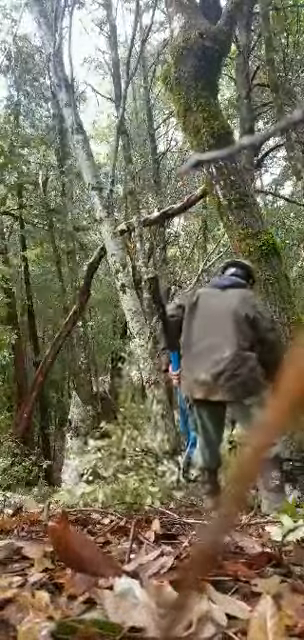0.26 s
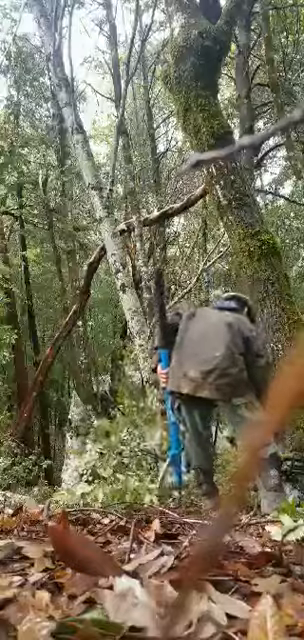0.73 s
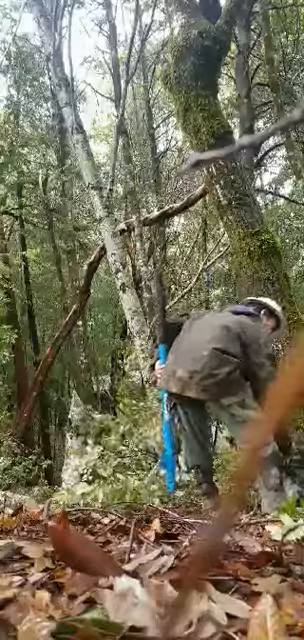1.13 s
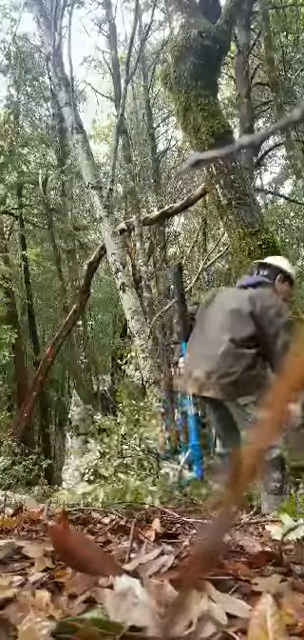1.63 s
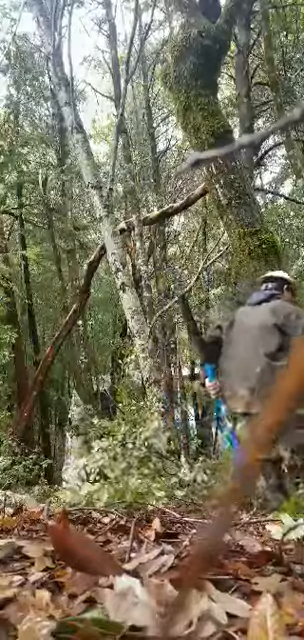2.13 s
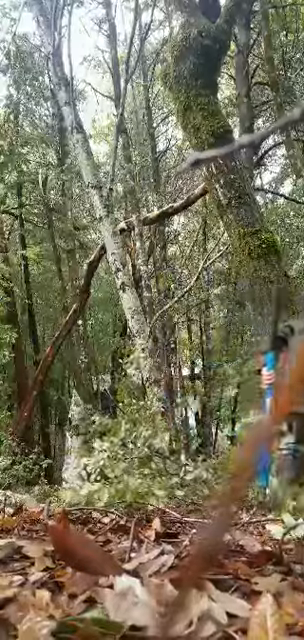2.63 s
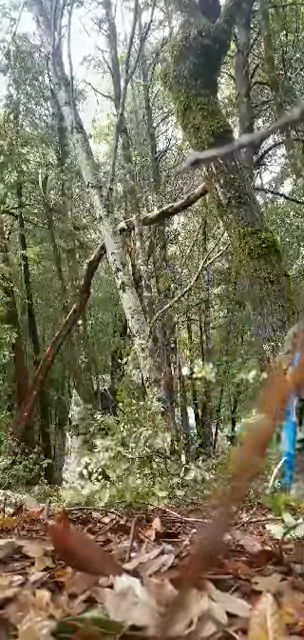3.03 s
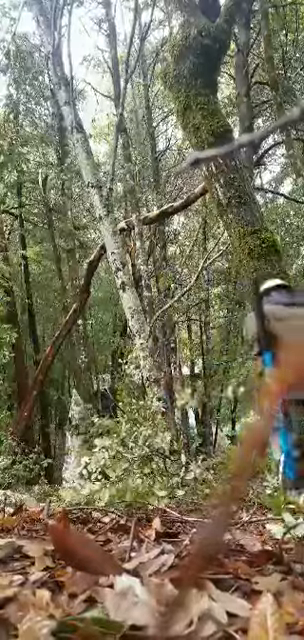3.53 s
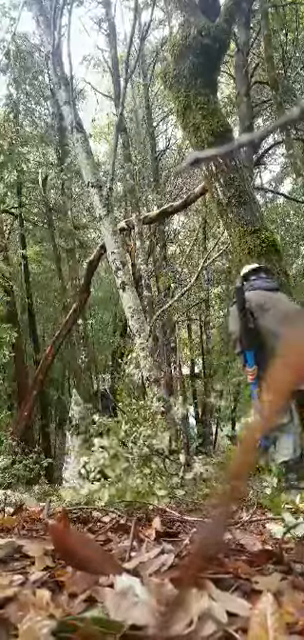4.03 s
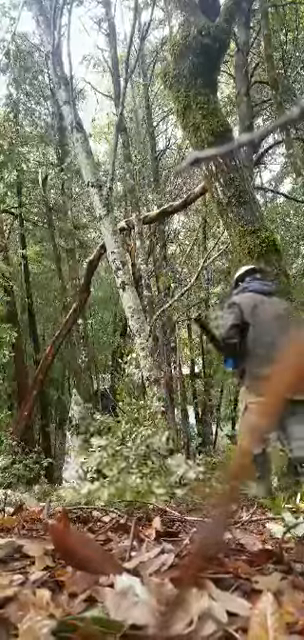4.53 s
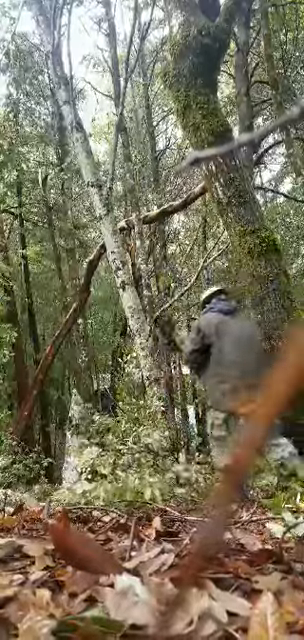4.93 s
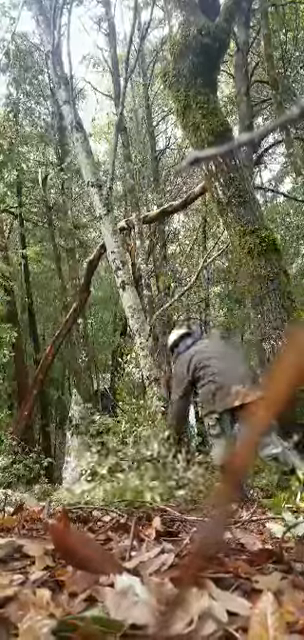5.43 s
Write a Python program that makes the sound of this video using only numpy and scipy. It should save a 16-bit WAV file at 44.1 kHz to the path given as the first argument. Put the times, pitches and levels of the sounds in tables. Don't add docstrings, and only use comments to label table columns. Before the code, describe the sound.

Someone shuffles through dry leaves and brush in a wood, a hard twig snap early on, faint foliage hiss and distant engine rumble.

```python
import sys
import numpy as np
from scipy import signal
from scipy.fft import rfft, irfft, next_fast_len
from scipy.io import wavfile
from scipy.ndimage import uniform_filter1d

SR = 44100
rng = np.random.default_rng(int(sys.argv[2]) if len(sys.argv) > 2 else 0)


def volts_from_db(level):
    exponent = np.asarray(level, float) / 20
    return 10 ** exponent


def inscribe(sig):
    pcm = np.round(np.clip(np.atleast_2d(sig).T, -1, 1) * 32767)
    wavfile.write(sys.argv[1], SR, pcm.astype(np.int16))


N = 250047
LONG = next_fast_len(N)


def leaves():
    # [f/Hz, level/dB per Hz]
    leaf_colour = [(290, -18.5), (500, -4.5), (937, -15.5), (1180, -5), (1410, -7), (2580, -4),
                   (3340, -7.5), (3780, -6), (4330, -6), (4830, -3), (5460, -6), (6800, -5.5),
                   (9310, -11.5), (12600, -11), (13100, -14)]
    # [start t/s, length/s, stirring level/dB, change by the end/dB, fine fizz relative level/dB]
    stirs = [(0.0, .06, -58.5, -4.5, -3), (0.065, 0.13, -50.5, -0.5, -4), (.212, 0.059, -60, 0.5, -3),
             (0.342, 0.11, -61, -6.5, -7), (.48, .11, -63.5, -0.5, -2), (0.685, 0.024, -59.5, -5, -2.5),
             (0.737, 0.065, -70, -1.5, -1), (1.207, 0.072, -63, 1.5, -1.5), (1.31, 0.22, -62.5, 2.5, -6),
             (1.518, 0.23, -53.5, 2.5, -5.5), (1.765, 0.21, -49, -2.5, -6), (2.008, 0.066, -53, 0.5, -3),
             (2.102, 0.4, -45, 0, -4), (2.524, 0.48, -46, -9, -4.5), (3.0, 0.31, -52.5, -4.5, -4),
             (3.317, 0.23, -57.5, -1, -4), (3.552, 0.137, -55.5, 7, -4), (3.693, 0.16, -47, -7, -3.5),
             (3.861, 0.15, -51, 0.5, -3), (4.015, 0.23, -51.5, -15, -3.5), (4.248, 0.24, -64, 2, -3),
             (4.502, .27, -57.5, 0, -2), (4.861, 0.32, -63, -6.5, 0), (5.238, .43, -72, 13.5, 2.5)]
    crackle = grains(per_s=4000, spread_db=2.5, ring_s=0.00082, clump_db=2.0, clump_hz=25.6)
    rustle = 0.85 * rng.standard_normal((2, N))
    field = per_band(pair(crackle + rustle, [(300, -60)] + leaf_colour + [(13400, -70)]))
    hz, t, z = signal.stft(field, SR, nperseg=256, noverlap=192)

    power = gestures(stirs, t, rise_s=0.021, settle_db_per_s=494)
    level_db = 10 * np.log10(power.sum(0))
    fizz_db = np.transpose(stirs)[4] @ power / power.sum(0)
    heavy_db = 0.6 + 0.13 * np.clip(weight_db(t) - level_db, -20, 20)
    heavy = np.clip((3600 - hz) / 1200, 0, 1)[:, None] * heavy_db
    fizz = np.clip((hz - 6500) / 1500, 0, 1)[:, None] * (fizz_db + 4.5)

    patches = rng.standard_normal((len(t), len(hz))).T
    patches = uniform_filter1d(patches, size=2, axis=0)
    patches = evened(uniform_filter1d(patches, size=24, axis=1))
    struck = rng.random((len(t), len(hz))).T < 0.012
    rings = rng.exponential(1, (len(t), len(hz))).T * struck
    rings = signal.lfilter([1], [1, -0.85], rings, axis=1)

    gain_db = level_db + heavy + fizz + 2.0 * patches + 3.84 * np.minimum(rings, 3)
    return signal.istft(z * volts_from_db(gain_db), SR, nperseg=256, noverlap=192)[1][:, :N]


def soil():
    # [f/Hz, level/dB per Hz]
    soil_colour = [(65, -38), (110, 0.5), (178, -3), (274, -1.5), (307, 1), (420, -0.5), (642, -19),
                   (937, -22.5), (1000, -22), (1300, -51), (2200, -120)]
    lumps = grains(per_s=260, spread_db=1.9, ring_s=0.0018, clump_db=1.7, clump_hz=7.7)
    thud = lumps + 0.49 * rng.standard_normal((2, N))
    thud = evened(pair(thud, [(70, -48)] + soil_colour + [(1500, -60)]))
    return volts_from_db(heard(weight_db) - 2.24) * thud


def weight_db(t):
    # [start t/s, length/s, level/dB, change by the end/dB]
    treads = [(.05, 0.15, -54.5, -3.5), (.3, 0.065, -57, -1.5), (.47, 0.084, -63, -0.5),
              (.65, .35, -75.5, 8), (1.02, .03, -58.5, -4), (1.24, 0.2, -56, -1.5),
              (1.51, 0.018, -50.5, 4.5), (1.58, 0.12, -59, 10), (1.75, 0.05, -51.5, 2),
              (1.85, 0.22, -57.5, 6), (2.1, 0.11, -44, 2), (2.24, 0.41, -47, -1), (2.72, 0.15, -53, 6),
              (2.9, 0.52, -57, 0), (3.45, 0.14, -54.5, 2), (3.62, 0.1, -45.5, 0.5), (3.82, 0.19, -45, 2),
              (4.08, 0.093, -51.5, -7.5), (4.25, 0.13, -61, 1.5), (4.46, 0.04, -51, -5.5),
              (4.55, 0.28, -50.5, -2.5), (4.88, 0.23, -59.5, -0.5), (5.25, .2, -56, 3),
              (5.52, 0.12, -53.5, -2.5)]
    rest_db = -70.5
    power = gestures(treads, t, rise_s=0.034, settle_db_per_s=184).sum(0)
    return 10 * np.log10(power + volts_from_db(rest_db) ** 2)


def snap(db, ring_hz, knock_db, top_db, t60):
    t = np.arange(int(SR * 0.05)) / SR
    fade = volts_from_db(-60 * t / max(t60, 0.002)) * np.minimum(t / 0.0002, 1)
    noise = rng.standard_normal((3, len(t)))
    noise[:, 8] += 3
    cracks = (noise[0] + 1.1 * noise[1:]) * fade
    ring = np.sin(2 * np.pi * ring_hz * t) * fade * rng.uniform(0.78, 1, (2, 1))
    body = band(cracks, 0.52 * ring_hz, min(2.18 * ring_hz, 14000))
    body = body / abs(body).max() + 0.35 * ring
    top = band(cracks, 9000, 14700) * volts_from_db([[-6.0], [6.0]])
    knock = band(noise[0] * fade ** 0.5, 220, 1140)
    parts = (body, 0), (top, top_db + 5.5), (knock, knock_db - 7.0)
    mix = sum(volts_from_db(db + rel_db) * part / abs(part).max() for part, rel_db in parts)
    return mix * volts_from_db([[-1.5], [1.5]])


def breaking():
    # [t/s, peak level/dB, ring f/Hz]
    snaps = [(0.0615, -45, 2490), (0.16, -29, 2640), (0.2022, -22.5, 6900), (0.6556, -31, 6500),
             (0.6558, -34, 3400), (0.6914, -37, 5080), (0.9146, -43.5, 6100), (1.0182, -40, 5130),
             (1.552, -31.5, 1950), (1.581, -39, 1760), (1.6097, -34, 2620), (1.6162, -26.5, 6700),
             (1.6596, -26, 5540), (1.6834, -33, 4980), (1.7694, -38, 4680), (1.9307, -33, 2720),
             (1.9616, -30, 2120), (2.0974, -28, 2140), (2.1642, -35, 2690), (2.179, -24, 2640),
             (2.5394, -32, 1200), (2.689, -27, 4720), (3.266, -40, 6840), (4.2665, -32, 4300),
             (4.428, -34, 12000), (4.605, -43, 12000), (4.8394, -55, 1110), (5.0688, -30, 4320),
             (5.0688, -35, 6400), (5.566, -40, 7400)]
    # [t/s, peak level/dB, ring f/Hz, low knock relative level/dB, t60/s]
    twigs = [(0.2945, -21, 3230, -12.5, 0.02), (.2946, -23.5, 5470, -30, 0.013),
             (0.3208, -26, 3100, -18, 0.017), (0.3215, -9, 4760, -24, .0045),
             (0.3209, -23, 12400, -29, .0052), (0.3208, -26.5, 1190, -6, 0.017),
             (0.335, -31, 4670, -6, .007), (1.0297, -48.5, 700, 2, 0.027), (1.5233, -25, 1390, -12, 0.02),
             (2.3090, -35, 2450, -10, .011), (4.3700, -53, 1000, 7, .011), (5.0690, -34, 1900, -24, .013)]
    events = [(s, db, hz, -22, -27, 0.012) for s, db, hz in snaps]
    for s, db, hz, knock_db, t60 in twigs:
        top_db = -13.5 + 5 * np.log2(hz / 3000)
        events.append((s, db, hz, knock_db, top_db, t60))
    breaks = np.zeros((2, N + SR))
    for s, *settings in events:
        sound = snap(*settings)
        start = round(s * SR)
        breaks[:, start:start + sound.shape[1]] += sound
    return breaks


def scattered(breaks):
    t = np.arange(int(SR * 0.15)) / SR
    tail = band(rng.standard_normal((2, len(t))), 300, 8000)
    tail = tail * volts_from_db(-60 * t / 0.09) * (t > 0.003)
    return signal.oaconvolve(breaks, tail / np.linalg.norm(tail[0]), axes=1)


def hush():
    # [f/Hz, level/dB per Hz]
    hush_colour = [(350, -28), (600, -14), (978, -12.5), (1520, -8.5), (3120, -9.5), (3590, -4.5),
                   (5850, -1), (7290, -6), (10200, -13), (13000, -8)]
    hiss = pair(rng.standard_normal((2, N)), hush_colour + [(13350, -65)])
    return volts_from_db(-66.6) * per_band(hiss)


def rumble():
    # [t/s, level/dB]
    swell = [(0.0, -63), (0.08, -47.5), (0.58, -58), (2.08, -54.5), (2.98, -56.5), (3.81, -54),
             (3.85, -49.5), (4.39, -58.5), (4.44, -57.5), (5.67, -56)]
    # [t/s, drone f/Hz, share of the rumble level/dB]
    engine = [(0, 78.2, -6.5), (.55, 74, 0), (.8, 86.2, -2), (1.5, 89.1, -2), (2.1, 97.5, 2),
              (2.5, 100, -6), (2.9, 102.7, 0.5), (4.0, 106.2, -3), (4.1, 74.4, -5), (4.9, 72, -3),
              (5.1, 72, -12), (5.67, 72, -0.5)]
    # [f/Hz, level/dB per Hz]
    air_colour = [(13, -43), (22, -26), (51, 6), (81, 1), (102, 2), (179, -4), (250, -8), (320, -19),
                  (550, -120)]
    t = np.arange(N) / SR
    level_db, = curves(swell, t)
    hz, drone_db = curves(engine, t)
    wide = evened(pair(rng.standard_normal((2, N)), [(12, -60)] + air_colour + [(400, -74)]))

    turn = np.exp(2j * np.pi * np.cumsum(hz) / SR)
    r = np.exp(-np.pi * 11 / SR)
    drone = rng.standard_normal(N) / turn
    for _ in range(2):
        drone = signal.lfilter([1 - r], [1, -r], drone)
    drone = drone / np.sqrt(np.mean(abs(drone) ** 2))
    drone = evened(((drone + 1.3) * turn).real)

    shake_db = heard(weight_db) - 9
    return np.hypot(volts_from_db(level_db), volts_from_db(shake_db)) * evened(wide + volts_from_db(drone_db) * drone)


def grains(per_s, spread_db, ring_s, clump_db, clump_hz, count=7):
    out = np.zeros((2, N))
    t = np.arange(int(SR * 0.03)) / SR
    for _ in range(count):
        size = volts_from_db(spread_db * np.minimum(rng.exponential(1, (2, N)), 5))
        clicks = size * (rng.random((2, N)) < per_s / count / SR)
        decay_s = ring_s * 3 ** rng.uniform(-0.81, 1)
        burst = rng.standard_normal(len(t)) * np.exp(-t / decay_s)
        out += signal.oaconvolve(clicks, burst[None] / np.linalg.norm(burst), axes=1)[:, :N]
    return evened(out * volts_from_db(clump_db * slow(clump_hz)))


def gestures(rows, t, rise_s, settle_db_per_s):
    start, length, db, change_db = np.transpose(rows)[:4, :, None]
    u = t - start
    after = np.clip(u - length, 0, 2)
    linger_db = -8 - 74 * after
    settle_db = np.maximum(-settle_db_per_s * after, linger_db)
    slope_db = change_db * np.clip(u / length, 0, 1)
    rise = np.clip(u / rise_s + 1, 0, 1)
    return (volts_from_db(db + slope_db + settle_db) * rise) ** 2 + 1e-11


def pair(x, points):
    # [f/Hz, left-right likeness/0..1]
    likeness = [(60, 0.9), (150, 0.93), (380, 1), (950, 0.74), (2380, 0.49), (5980, 0.2), (15000, 0.21)]
    hz = np.fft.rfftfreq(LONG, 1 / SR)
    a, b = rfft(x, LONG) * volts_from_db(read(points, hz))
    angle = np.arccos(np.clip(read(likeness, hz), 0, 1)) / 2
    mid, side = a * np.cos(angle), b * np.sin(angle)
    return irfft(np.array([mid + side, mid - side]), LONG)[:, :N]


def evened(x):
    return x / np.sqrt(np.mean(x ** 2) + 1e-20)


def per_band(field):
    return field / np.sqrt(np.mean(band(field.mean(0), 3000, 7000) ** 2))


def read(points, hz):
    f, value = np.transpose(points)
    return np.interp(np.log(hz + 1), np.log(f + 1), value)


def curves(rows, t):
    s, *columns = np.transpose(rows)
    return [np.interp(t, s, c) for c in columns]


def heard(control, hop=64):
    t = np.arange(0, N + hop, hop) / SR
    return np.interp(np.arange(N) / SR, t, control(t))


def band(x, lo_hz, hi_hz):
    sos = signal.butter(2, [lo_hz, min(hi_hz, 0.45 * SR)], "band", fs=SR, output="sos")
    return signal.sosfilt(sos, x)


def slow(hz):
    sos = signal.butter(2, hz, fs=SR, output="sos")
    return evened(signal.sosfiltfilt(sos, rng.standard_normal(N + 2 * SR))[SR:-SR])


def scene():
    breaks = breaking()
    tail = scattered(breaks)
    return leaves() + soil() + breaks[:, :N] + volts_from_db(-47) * tail[:, :N] + hush() + rumble()


def thrift(x):
    # [f/Hz, threshold relative to the loudness level/dB]
    spared = [(1500, -5), (2500, -3.5), (4000, -9), (7000, 2.5), (8500, -13.5), (11000, -16),
              (12900, -13.5), (13300, -12)]
    hz, t, z = signal.stft(x, SR, nperseg=1024, noverlap=768)
    edges = np.searchsorted(hz, np.append(np.geomspace(1500, 13350, 56), 16000))
    width = np.diff(edges)
    held = np.arange(len(t)) // 4 * 4
    power = uniform_filter1d(abs(z) ** 2, size=4, axis=2, origin=-2)[:, :, held]
    bands_db = 10 * np.log10(np.add.reduceat(power, edges, axis=1)[:, :-1] / width[:, None] + 1e-20)

    loud_db = bands_db[:, :-1].mean((0, 1))
    threshold_db = 0.8 * loud_db - 18.3 + read(spared, hz[edges[:-1]])[:, None]
    under_db = threshold_db - bands_db
    jitter = uniform_filter1d(rng.standard_normal((len(t), len(width))), size=3, axis=0)
    under_db += 2.6 * jitter[held].T
    luck = uniform_filter1d(rng.standard_normal((len(t), len(width))), size=9, axis=0)[held].T
    under_db[:, 4:-14] += 30 * (evened(luck)[4:-14] > 1.45)

    keep = volts_from_db(-45 * np.clip(under_db + 0.5, 0, 1))
    z[:, edges[0]:edges[-1]] *= np.repeat(keep, width, axis=1)
    z[:, edges[-1]:] = 0
    return signal.istft(z, SR, nperseg=1024, noverlap=768)[1][:, :N]


def band_limit(x):
    return signal.sosfilt(signal.butter(12, 16430, fs=SR, output="sos"), x)


def record(dry):
    # [f/Hz, left over right level/dB]
    port_tilt = [(60, 1), (200, 2.5), (400, 1), (1300, 3.5), (2400, 3), (4400, 1.5), (6800, -3),
                 (8200, 15.5), (10000, 11.5), (13000, 11.5)]
    # [f/Hz, level/dB]
    roll_off = [(13200, 0), (13700, -11), (15000, -17), (16400, -28)]
    lag_s = 5e-5
    hz = np.fft.rfftfreq(LONG, 1 / SR)
    half_db = read(port_tilt, hz) / 2
    left = volts_from_db(half_db) * np.exp(-2j * np.pi * hz * lag_s)
    ports = np.array([left, volts_from_db(-half_db)])
    ports /= np.sqrt(np.mean(abs(ports) ** 2, 0))
    ports *= volts_from_db(read(roll_off, hz))
    mix = irfft(rfft(dry, LONG) * ports, LONG)[:, :N]
    return band_limit(thrift(mix))


dry = scene()
out = record(dry)
inscribe(out)
```